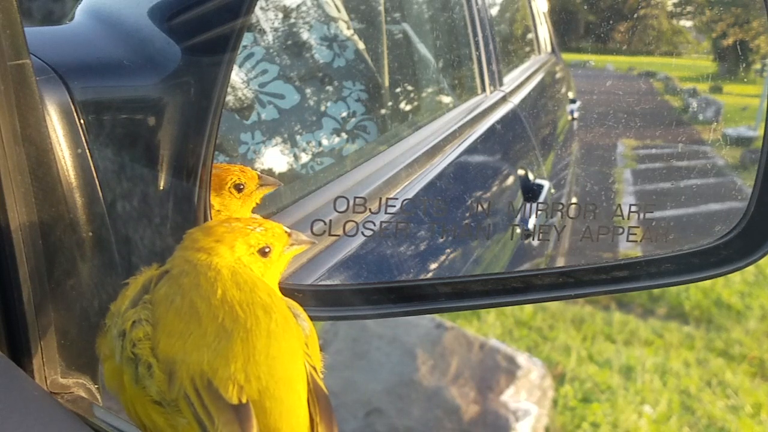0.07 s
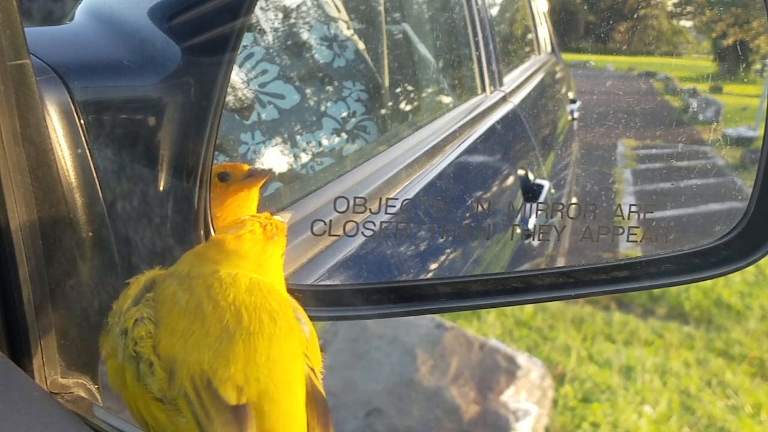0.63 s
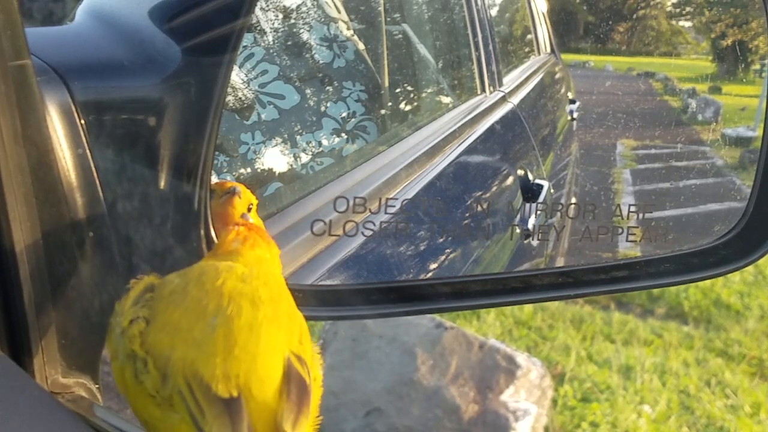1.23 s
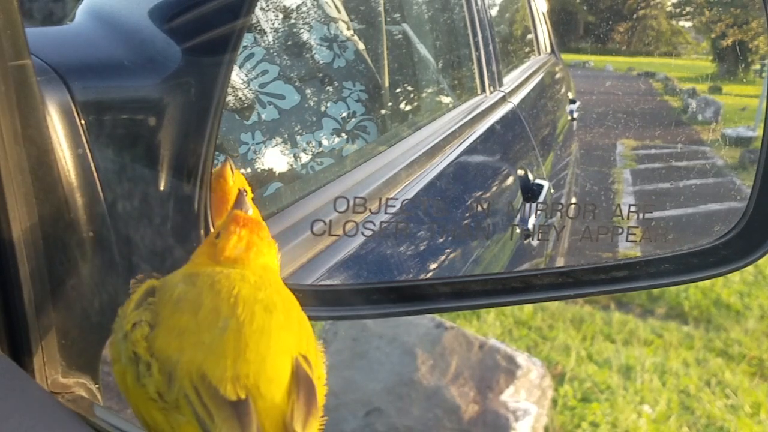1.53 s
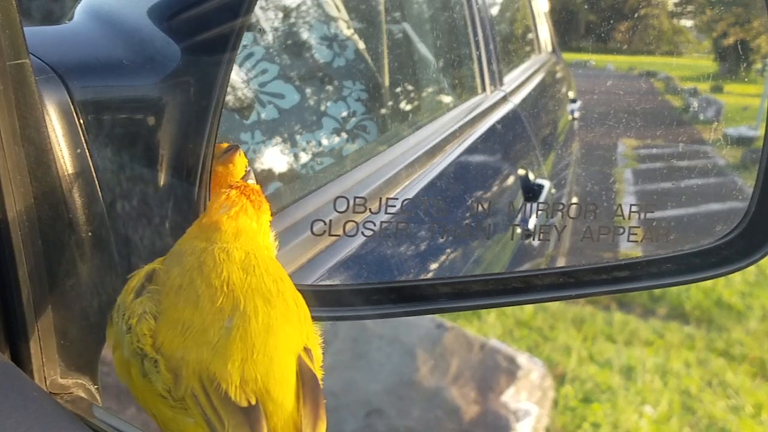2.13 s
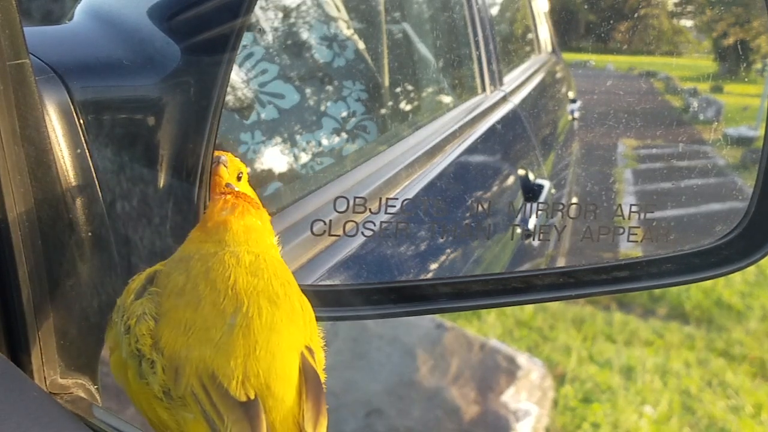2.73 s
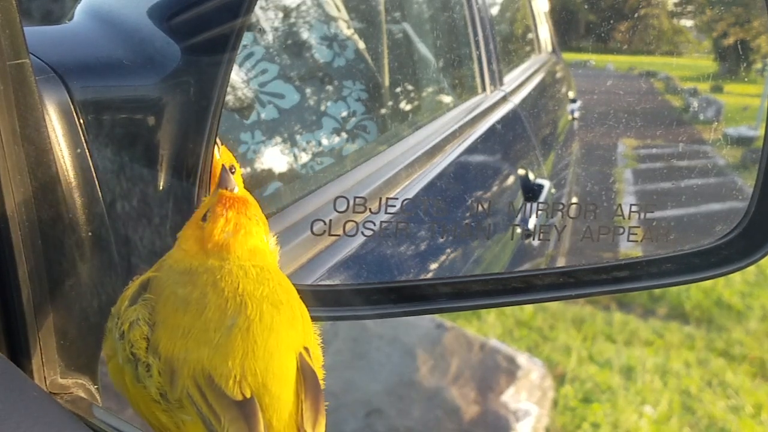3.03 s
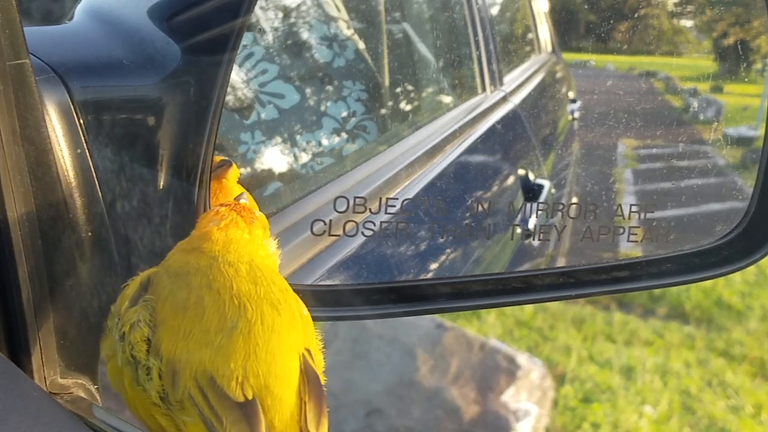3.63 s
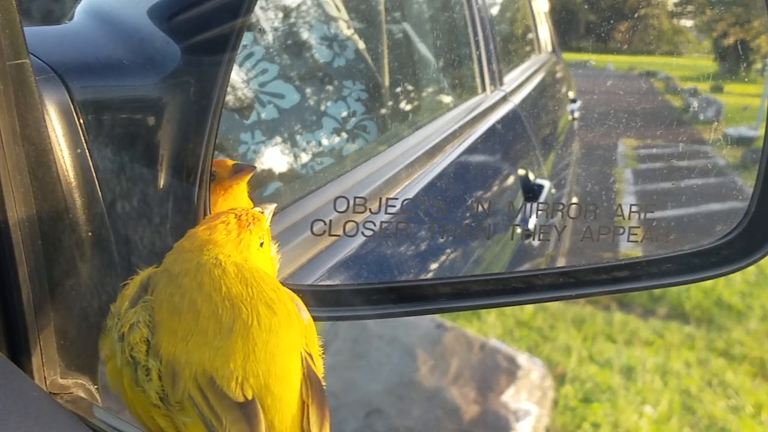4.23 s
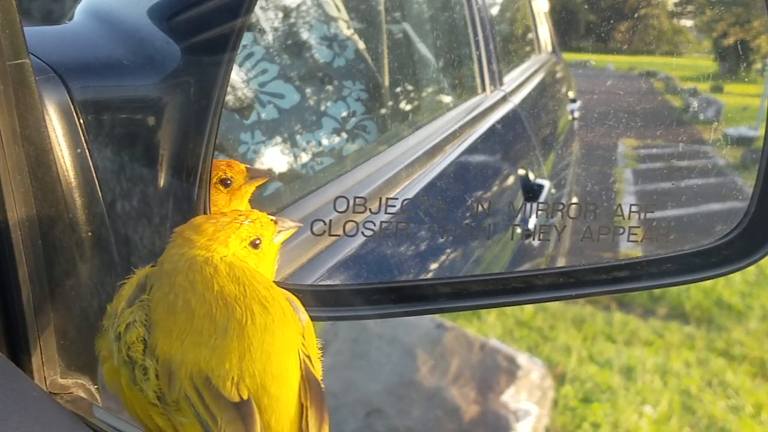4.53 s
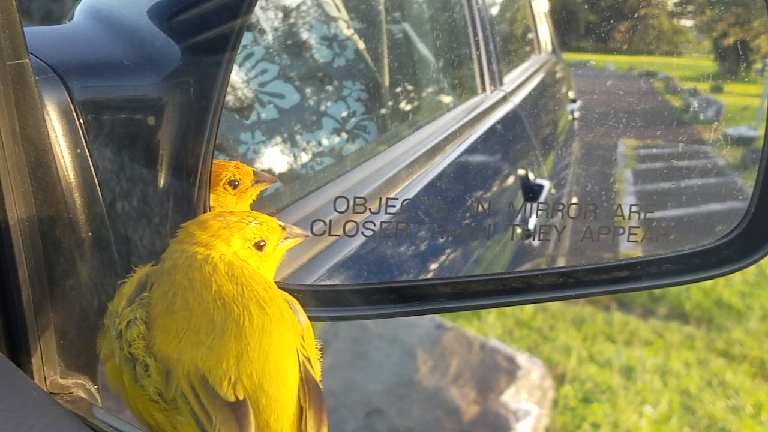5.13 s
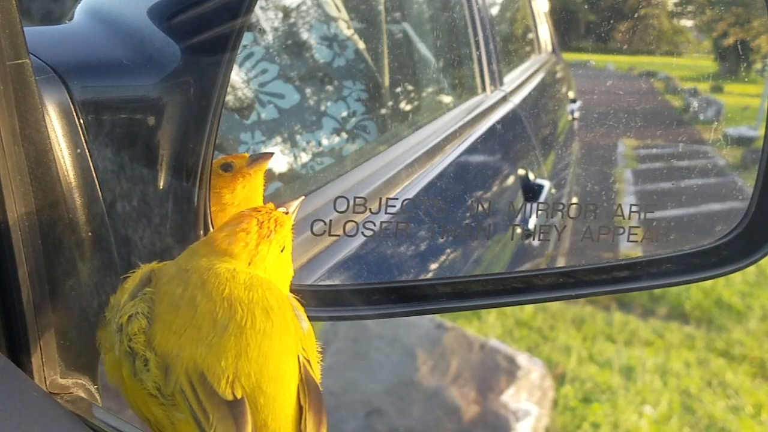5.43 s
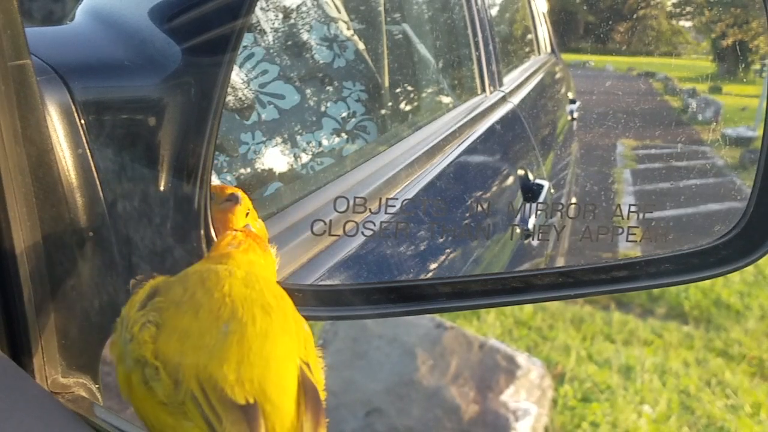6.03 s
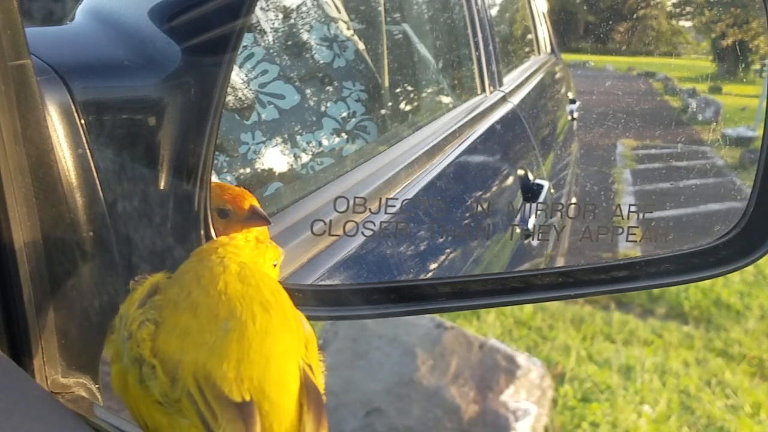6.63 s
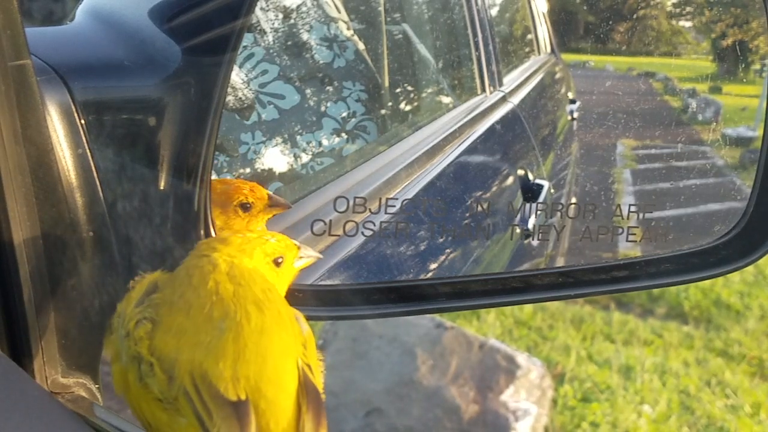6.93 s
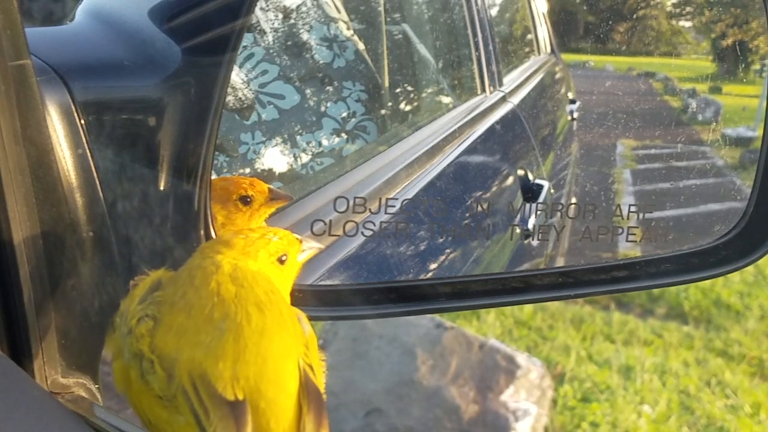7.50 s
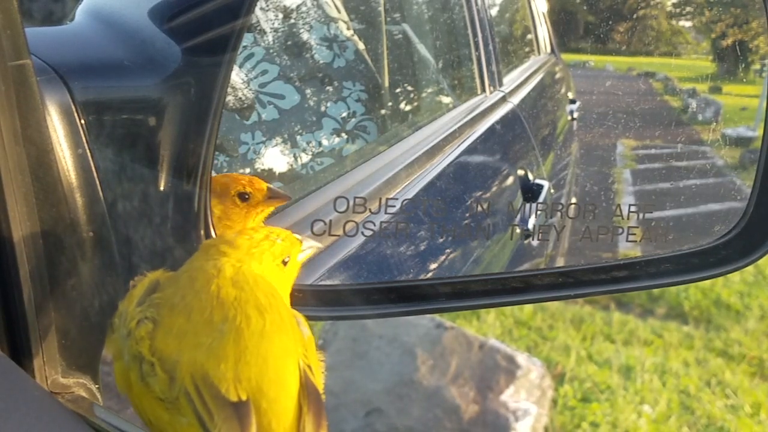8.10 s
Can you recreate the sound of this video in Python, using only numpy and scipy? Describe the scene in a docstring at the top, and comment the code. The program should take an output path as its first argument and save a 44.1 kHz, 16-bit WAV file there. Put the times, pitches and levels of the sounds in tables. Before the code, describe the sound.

A small bird pecks a car's side mirror in three double taps, each a light tick on glass with a hollow thump in the housing and door. Two pairs come early, then the bird gives one tiny high chip, and the last pair follows later. Heard from inside the parked car, a faint low hum and hiss continue beneath distant whistling songbirds and very faint, high insect chirps.

```python
"""A low hum and the thin, high chirping of two insects taking turns, heard inside a parked car.
A small bird pecks the side mirror in three double taps: each impact ticks on the glass and thumps
through the resonant modes of housing, door and cabin. Once the bird gives a tiny falling chip.
Far songbirds whistle nearly pure tones, blurred by reflections, over a faint even hiss."""
import sys
import numpy as np
from scipy import signal
from scipy.fft import rfft, irfft
from scipy.io import wavfile
from scipy.ndimage import uniform_filter1d

SR = 44100
rng = np.random.default_rng(int(sys.argv[2]) if len(sys.argv) > 2 else 0)


def store_pcm(level_fs):
    """Save levels as 16-bit WAV."""
    pcm = np.round(np.clip(level_fs, -1, 1) * 32767).astype(np.int16)
    wavfile.write(sys.argv[1], SR, np.atleast_2d(pcm).T)


N = 364266


def gain_of(db):
    """Amplitude ratio of a level: a factor of ten per 20 dB."""
    return 10 ** (np.asarray(db) / 20)


def unit_rms(x):
    """Normalisation to unit mean power."""
    return x / np.sqrt(np.mean(x ** 2) + 1e-20)


def at_frequency(points, hz):
    """Interpolation of a spectrum on a logarithmic frequency axis."""
    f, value = np.transpose(points)
    return np.interp(np.log(hz + 1), np.log(f + 1), value)


def colour(x, points):
    """Spectral shaping by a curve of (frequency [Hz], gain [dB])."""
    size = x.shape[-1]
    return irfft(rfft(x) * gain_of(at_frequency(points, np.fft.rfftfreq(size, 1 / SR))), size)


def pan(left_db):
    """Interaural level difference, as a gain for each ear."""
    return gain_of([[left_db / 2], [-left_db / 2]])


def add(mix, start_s, sound):
    """Superposition of a stereo sound on the mix."""
    part = mix[:, max(round(start_s * SR), 0):][:, :sound.shape[1]]
    part += sound[:, :part.shape[1]]


def reverberate(x, t60, wet_db):
    """Reverberation: an exponentially decaying tail of reflections, different at each ear."""
    t = np.arange(SR // 2) / SR
    tail = rng.standard_normal((2, len(t))) * gain_of(-60 * t / t60) * (t > .003)
    return x + gain_of(wet_db) * signal.fftconvolve(x, tail / np.linalg.norm(tail[0]), axes=1)[:, :N]


def ambient_noise(spectrum):
    """Interaural coherence: steady noise, alike at both ears in the bass, unrelated in the treble."""
    # (frequency [Hz], correlation between the ears [-1 to 1])
    coherence = [(60, .99), (130, .96), (290, .85), (640, .15), (1400, -.12), (3100, 0)]
    # (frequency [Hz], left minus right level [dB])
    balance = [(60, 0.5), (110, 0.0), (200, 0.0), (380, -2), (700, -3), (1290, 1), (2380, 0.5),
               (4400, -1.5), (8120, 5), (15000, 2.5)]
    hz = np.fft.rfftfreq(N, 1 / SR)
    common, separate = rfft(rng.standard_normal((2, N)))
    alike = np.clip(at_frequency(coherence, hz), -1, 1)
    lean = gain_of(at_frequency(balance, hz) / 2)
    right = alike * common + np.sqrt(1 - alike ** 2) * separate
    ears = irfft(np.array([common * lean, right / lean]), N)
    return unit_rms(colour(ears, spectrum))


def background(hum_db=3.0, drone_db=2.0, air_db=-65.5):
    """Slow amplitude modulation swells a hum and a deeper drone under steady air and microphone hiss."""
    # noise spectra: (frequency [Hz], relative spectral density [dB])
    hum_spectrum = [(15, -31), (25, -15), (45, 0.5), (70, -3.5), (108, 2), (140, -4.5), (185, 1),
                    (215, -6.5), (265, -8.5), (320, -14.5), (370, -16), (450, -24.5), (650, -38),
                    (1100, -88)]
    drone_spectrum = [(25, -42), (42, -17.5), (52, -3.5), (63, 0), (74, -6), (95, -26), (150, -70)]
    air_spectrum = [(240, -25), (400, -1.5), (467, -5), (644, -3.5), (1050, -7), (1920, -8.5),
                    (2310, -12.5), (4140, -18.5), (6090, -23), (6780, -22.5), (7440, -21), (9080, -25),
                    (13100, -18.5), (15100, -10.5), (15800, -14.5)]
    # swells: (time [s], relative level [dB])
    hum_swell = [(0.2, -60.5), (0.84, -56.5), (1.28, -59.5), (4.45, -62), (5.74, -58.5), (8.1, -61.5)]
    drone_swell = [(0.2, -65), (2.49, -65), (4.03, -66), (4.86, -59), (6.31, -58), (7.2, -65.5),
                   (8.1, -62.5)]
    t = np.arange(N) / SR
    hum = gain_of(hum_db + np.interp(t, *np.transpose(hum_swell))) * ambient_noise(hum_spectrum)
    drone = gain_of(drone_db + np.interp(t, *np.transpose(drone_swell))) * ambient_noise(drone_spectrum)
    return hum + drone + gain_of(air_db) * ambient_noise(air_spectrum)


def chirp_turns(first_s=.323, period_s=.5036):
    """Antiphony: one insect keeps a beat, the other answers. Gives (time [s], pitch [Hz]) per chirp."""
    # wait before the answer: (time [s], delay [s])
    answer_delay = [(0, 0.2), (3.4, .2), (5.4, .322)]
    # drift of each insect: (time [s], pitch [Hz])
    leader_pitch = [(0, 7650), (2.8, 7670), (4.2, 7790), (4.9, 7570), (7.4, 7310)]
    answer_pitch = [(0, 7600), (2, 7730), (3.6, 7780), (5.6, 7710), (6.2, 7600)]
    beats = np.arange(first_s - period_s, N / SR, period_s)
    answers = beats + np.interp(beats, *np.transpose(answer_delay))
    singers = [(beats, leader_pitch), (answers, answer_pitch)]
    return [(s, np.interp(s, *np.transpose(drift))) for times, drift in singers for s in times if s >= 0]


def insects(length_s=0.081, sag=.02, usual_hz=7710, db_per_hz=.013, octave_db=9):
    """Stridulation: faster scraping is higher and louder; each chirp sags and has a strong octave."""
    out = np.zeros((2, N))
    progress = np.linspace(-.5, .5, round(length_s * SR))
    envelope = signal.windows.tukey(len(progress), .3)
    for start_s, hz in chirp_turns():
        level_db = -84 + db_per_hz * (hz - usual_hz)
        rasp = np.interp(hz, [7400, 7750], [.019, .012])  # lower chirps are raspier
        jitter = unit_rms(uniform_filter1d(rng.standard_normal(SR // 4), size=50))[:len(progress)]
        phase = 2 * np.pi * np.cumsum(hz * (1 - sag * progress + rasp * jitter)) / SR
        tone = np.sin(phase) + gain_of(octave_db) * np.sin(2 * phase)
        add(out, start_s, gain_of(level_db) * envelope * tone * pan(left_db=17.5))
    return out


def whistle(length_s, start_hz, middle_hz, end_hz, level_db, waver=0.0089):
    """Frequency modulation: a pure tone glides through three pitches and wavers a little."""
    progress = np.linspace(0, 1, max(round(length_s * SR), 8))
    glide_hz = np.polyval(np.polyfit([0, .5, 1], [start_hz, middle_hz, end_hz], 2), progress)
    jitter = unit_rms(uniform_filter1d(rng.standard_normal(SR // 2), size=150))[:len(progress)]
    phase = 2 * np.pi * np.cumsum(glide_hz * (1 + waver * jitter)) / SR
    return gain_of(level_db) * unit_rms(np.sin(np.pi * progress) * np.sin(phase))


def phrase(notes, left_db):
    """Lateralisation: a level difference places a series of whistles to one side."""
    out = np.zeros((2, N))
    for start_s, *note in notes:
        add(out, start_s, whistle(*note) * pan(left_db))
    return out


def songbirds(rise_hz_per_s=2700):
    """Far song through the window on the right: reflected sound outweighs direct sound."""
    # swoops that level out: (time [s], length [s], lowest pitch [Hz], drop [Hz], relative level [dB])
    falling_notes = [(2.048, .05, 4700, 800, -75), (2.465, .12, 4300, 1000, -79.5),
                     (3.012, .1, 4000, 1410, -81), (3.155, .085, 3820, 1100, -79),
                     (3.51, .11, 4100, 450, -82), (3.766, .11, 2400, 1450, -76.5),
                     (4.405, .1, 4210, 750, -79), (7.058, .042, 3450, 1300, -79),
                     (7.276, .1, 3300, 1200, -81), (7.678, 0.12, 3350, 400, -78.5)]
    # slow rises: (time [s], length [s], start pitch [Hz], relative level [dB])
    rising_notes = [(2.167, 0.07, 3480, -81), (2.333, 0.072, 3980, -75.5), (2.54, 0.098, 5020, -86),
                    (5.133, 0.029, 5720, -76), (6.558, .045, 2830, -73.5), (7.015, .055, 4470, -79.5),
                    (7.845, .125, 3670, -81.5)]
    thirds = np.linspace(0, 1, 3)  # start, middle and end of a note
    bend = (1 - thirds / 0.7) ** 2  # lowest at 70 % of its length
    falls = [(s, length, *(hz + drop * bend), db) for s, length, hz, drop, db in falling_notes]
    rises = [(s, length, *(hz + rise_hz_per_s * length * thirds), db)
             for s, length, hz, db in rising_notes]
    return gain_of(-5.5) * reverberate(phrase(falls + rises, left_db=-4.0), t60=.22, wet_db=1.5)


def chip():
    """The near bird's brief downward glide, prolonged by reflections in the cabin."""
    # a main note over a weak lower one:
    # (time [s], length [s], start pitch [Hz], middle pitch [Hz], end pitch [Hz], relative level [dB])
    chip_notes = [(2.9368, .0055, 7900, 7250, 6850, -57.5), (2.934, .009, 5000, 4750, 4600, -77)]
    return gain_of(-3.0) * reverberate(phrase(chip_notes, left_db=7), t60=.09, wet_db=-3)


def pecks(tick_hz=2300, scatter_db=-53, scatter_t60=0.1):
    """Modal response to impact: the place struck and the beak's hardness weight the same modes."""
    # (time [s], force [dB], place on the glass [0 low to 1 high], extra tick of the beak [dB])
    impacts = [(0.698, 0.9, 0.021, 0.5), (0.8044, 0.5, 0, -6.5), (1.8189, 0.5, 0.92, -0.5),
               (2.009, 0, 0.73, 1.5), (5.6618, -.3, 0.14, -3.5), (5.7725, -0.7, 0.13, -1)]
    # mirror, door and cabin: (frequency [Hz], 60 dB decay time [s], build-up [s],
    # left base level [dB], right base level [dB], change when struck high [dB])
    modes = [(94, 0.202, 0.013, -40, -38.5, 4.5), (132.4, 0.13, 0.018, -38, -45, 0.5),
             (172.4, 0.32, 0.071, -56, -53, -14), (221, 0.25, 0.0057, -46, -41, 0),
             (252.7, 0.031, 0.015, -58, -29.5, -3), (291, 0.041, 0.0033, -28, -26, -0.5),
             (350, 0.02, 0.0082, -42.5, -23, 0.5), (359.5, 0.08, 0.0053, -26, -53, 1.7),
             (400.7, 0.042, 0.0075, -27.5, -33, 2), (423.9, 0.18, 0.00058, -47.5, -34, 2.5),
             (467, 0.1, 0.0003, -40.5, -64, 5), (610.4, 0.035, 0.0098, -46.5, -44.5, -1),
             (640.6, 0.11, 0.017, -64, -57, 7), (831, 0.07, 0.0089, -61, -48.5, -1.5),
             (862, 0.13, 0.0009, -67, -51, -4), (922, 0.073, 0.01, -71, -58, -3),
             (1041, 0.043, 0.0017, -48.5, -63, -9), (1130, 0.025, 0.0041, -62, -56, 8),
             (1278, 0.051, 0.00053, -42, -54, -12), (1321, 0.02, 0.005, -57, -45, -10.5),
             (1614, 0.058, 0.0027, -59, -64.5, -1), (1680, 0.072, 0.0018, -76, -64.5, 11),
             (2335, 0.024, 0.00062, -59.5, -60.5, -1.5), (2875, 0.033, 0.00021, -74, -50.5, -10),
             (3080, 0.037, 0.0008, -59, -65, 0), (3197, 0.017, 0.0015, -65, -51, -2),
             (3524, 0.026, 0.0032, -67.5, -64.5, 10), (3680, 0.012, 0.0004, -78, -70, 23),
             (4250, 0.0095, 0.0018, -83, -62.5, 11.5), (4370, 0.0096, 0.00043, -79, -65.5, 8.1)]
    # sound scattered in the cabin: (frequency [Hz], relative spectral density [dB])
    scatter_spectrum = [(300, -10), (600, -5), (900, -3), (1500, -9), (2500, -22), (3400, -14), (4400, -18),
                        (5400, -28), (8000, -40)]
    out = np.zeros((2, N))
    t = np.arange(SR // 2) / SR
    hz, t60, build_s, left_db, right_db, high_db = np.transpose(modes)[:, :, None]
    # the glass answers at once, the heavy door and the cabin air take several cycles to swell
    build_up = 1 - np.exp(-(t / build_s) ** 2)
    rings = -np.sin(2 * np.pi * hz * t) * gain_of(-60 * t / t60) * build_up
    rings /= abs(rings).max(1, keepdims=True)
    treble_share = 1 / (1 + (tick_hz / hz) ** 8)
    scatter_envelope = gain_of(scatter_db - 60 * t / scatter_t60) * (1 - np.exp(-t / 0.0018))
    for start_s, force_db, place, tick_db in impacts:
        mode_db = np.array([left_db, right_db]) + place * high_db + tick_db * treble_share
        ring = (gain_of(mode_db) * rings).sum(1)
        scatter = unit_rms(colour(rng.standard_normal((2, len(t))), scatter_spectrum))
        scatter = colour(scatter, [(tick_hz / 2, 0), (tick_hz * 2, tick_db)])
        add(out, start_s, gain_of(force_db) * (ring + scatter_envelope * scatter * pan(left_db=-1)))
    return out


def scene():
    """Superposition of all sources at the seat."""
    return pecks() + chip() + songbirds() + insects() + background()


def record(dry, cutoff_hz=15850):
    """Band limiting by a linear-phase low-pass filter."""
    low_pass = signal.firwin(511, cutoff_hz, window=("kaiser", 9), fs=SR)
    return signal.oaconvolve(dry, low_pass[None], "same", axes=1)


dry = scene()
out = record(dry)
store_pcm(out)
```